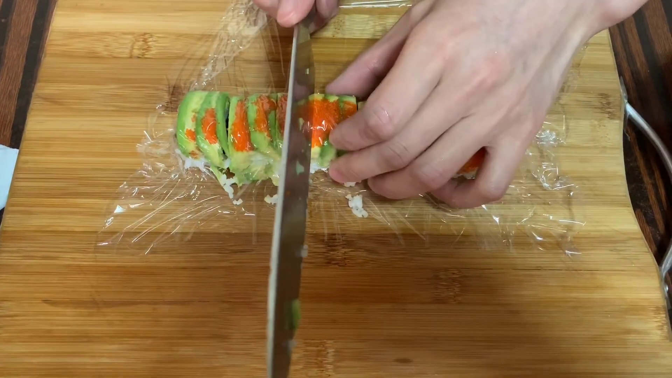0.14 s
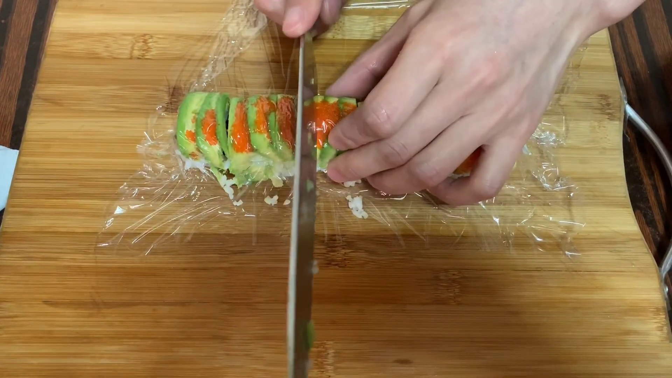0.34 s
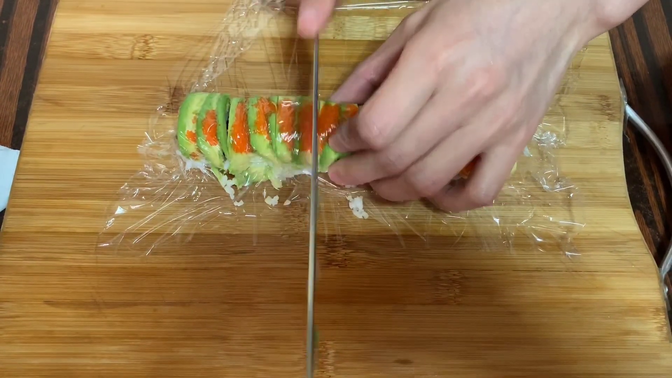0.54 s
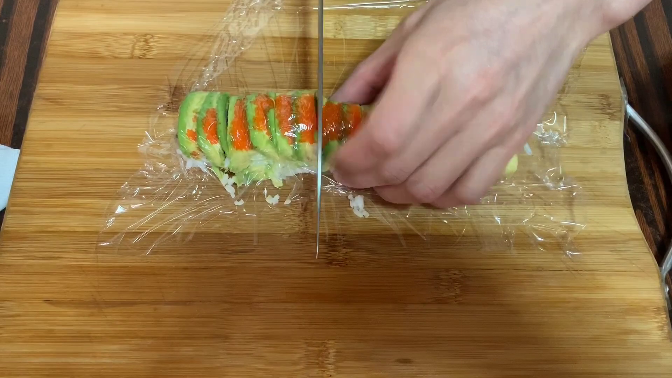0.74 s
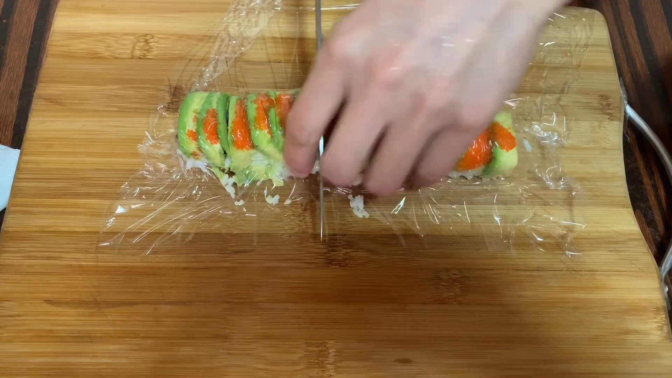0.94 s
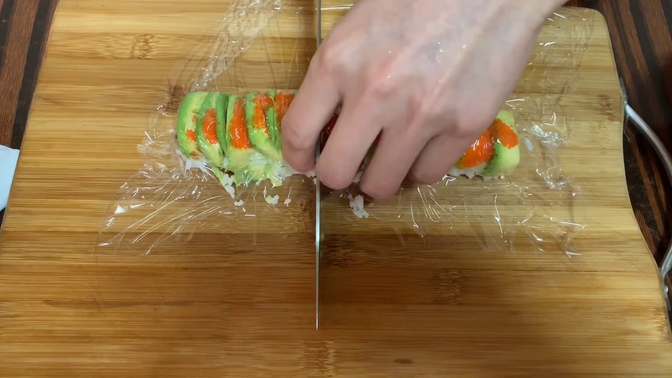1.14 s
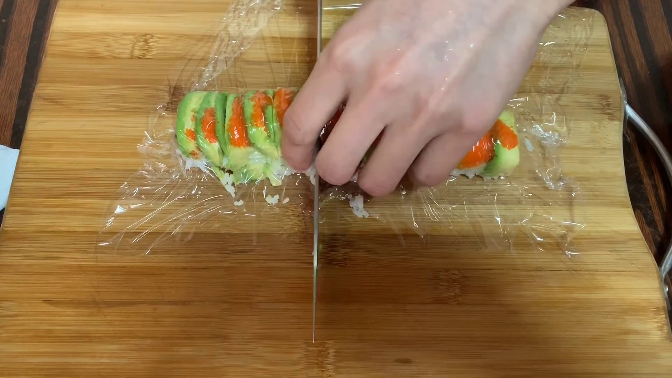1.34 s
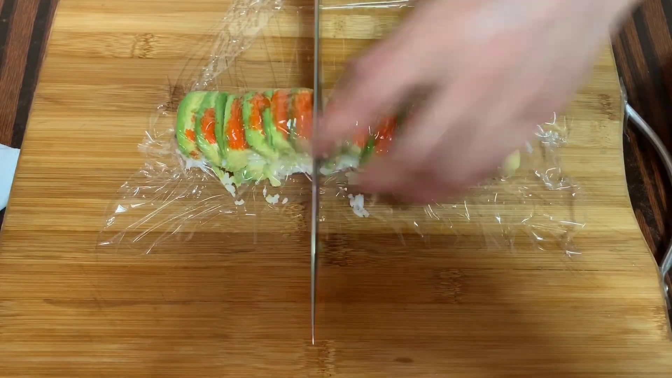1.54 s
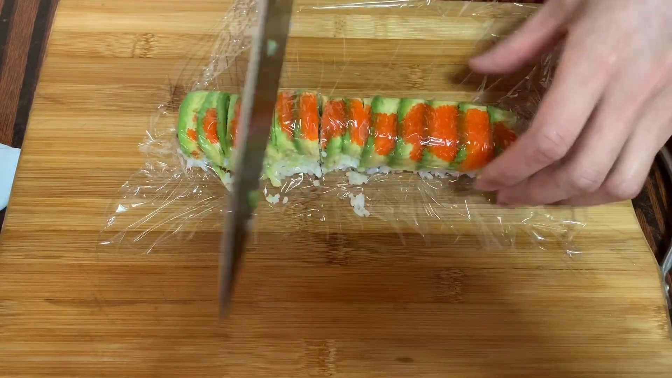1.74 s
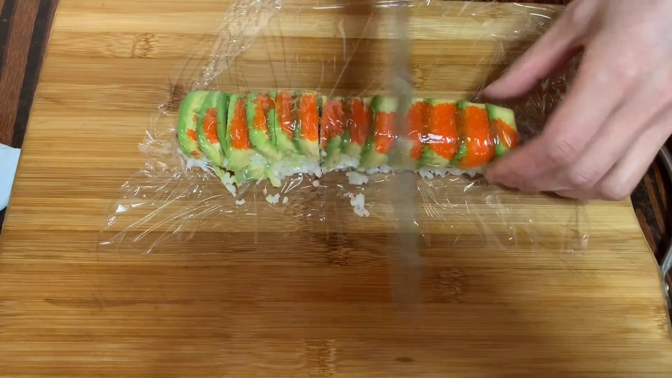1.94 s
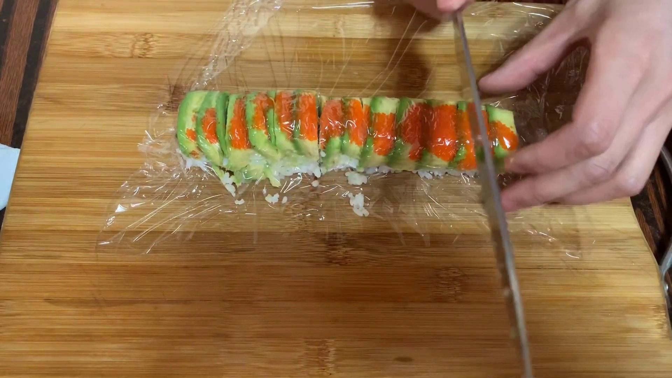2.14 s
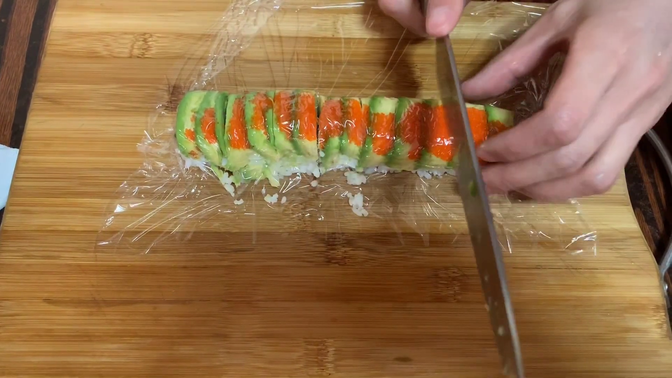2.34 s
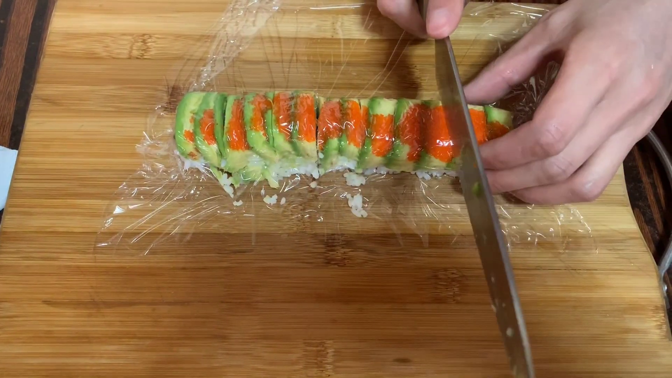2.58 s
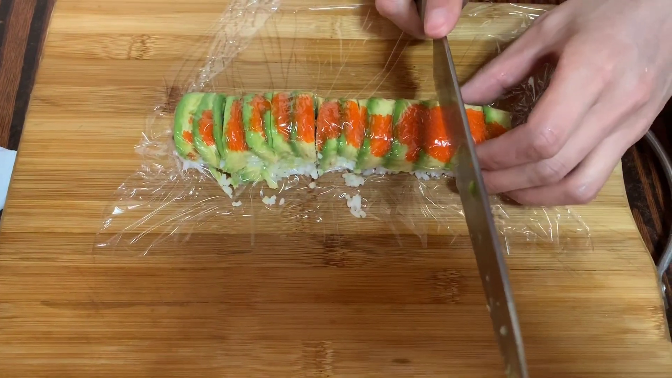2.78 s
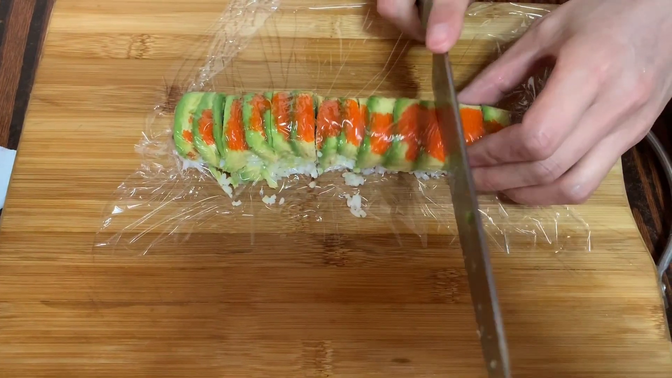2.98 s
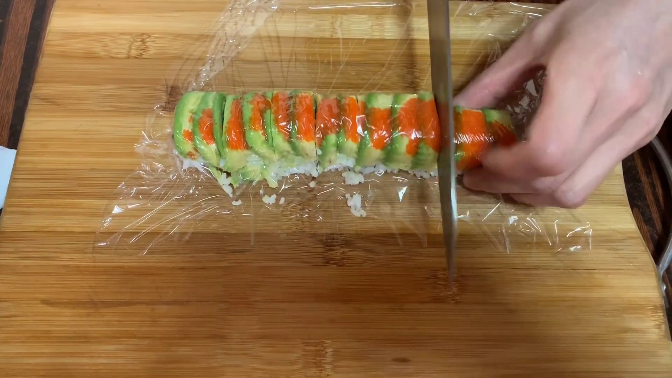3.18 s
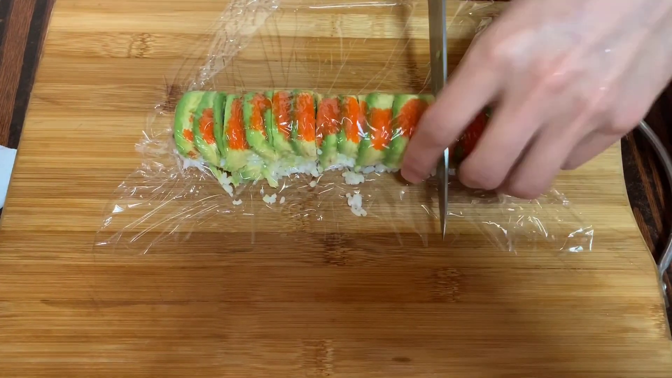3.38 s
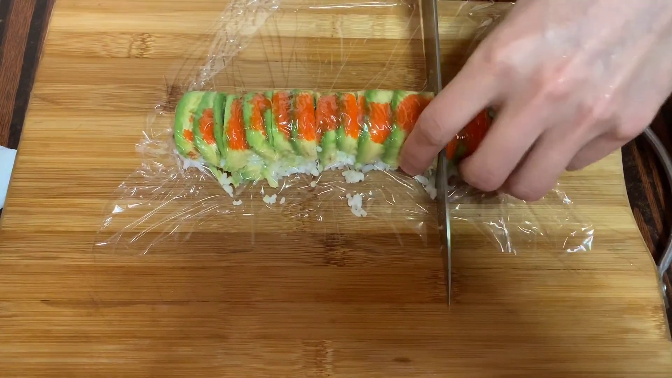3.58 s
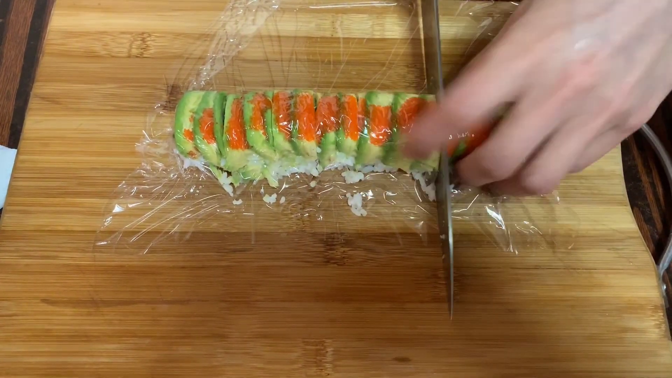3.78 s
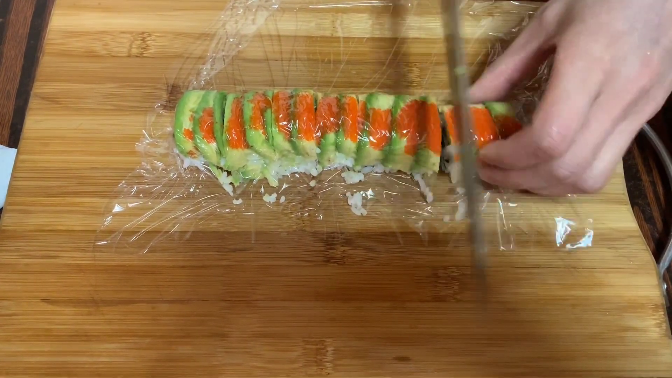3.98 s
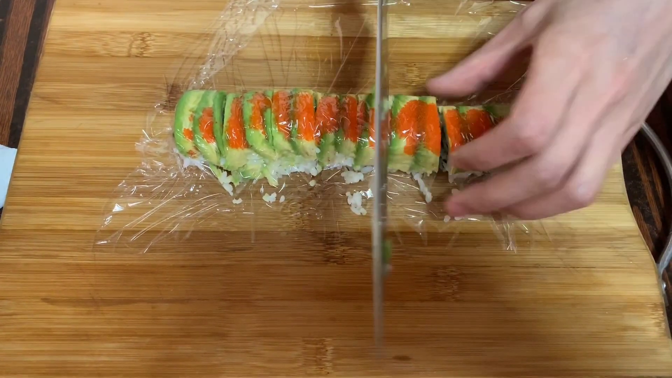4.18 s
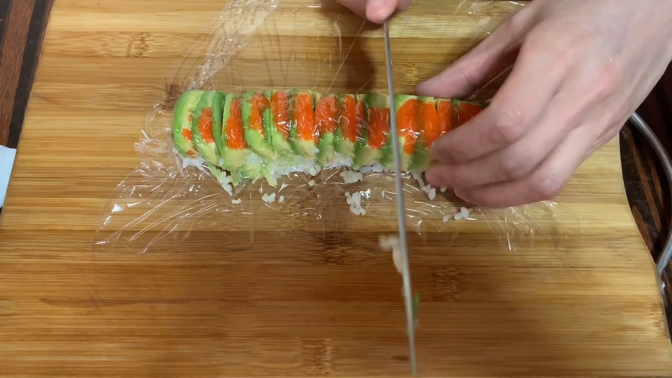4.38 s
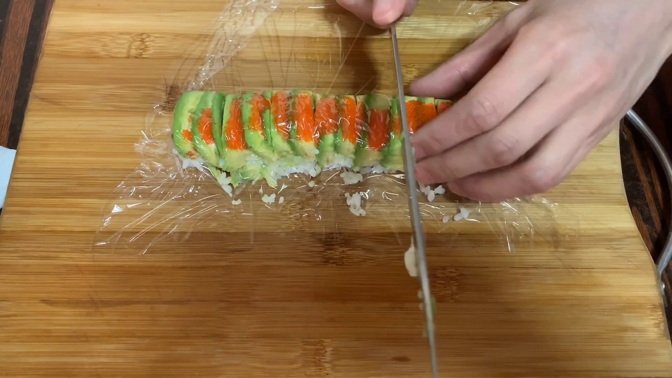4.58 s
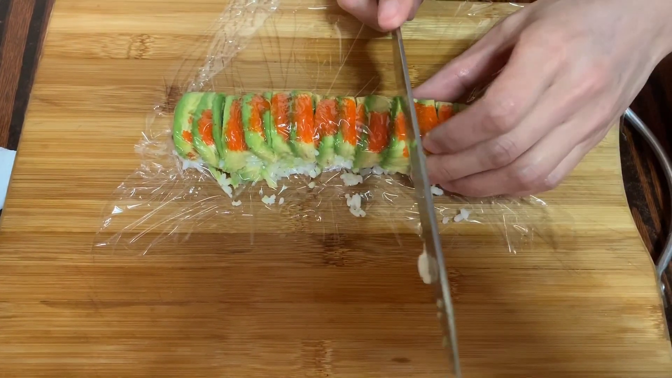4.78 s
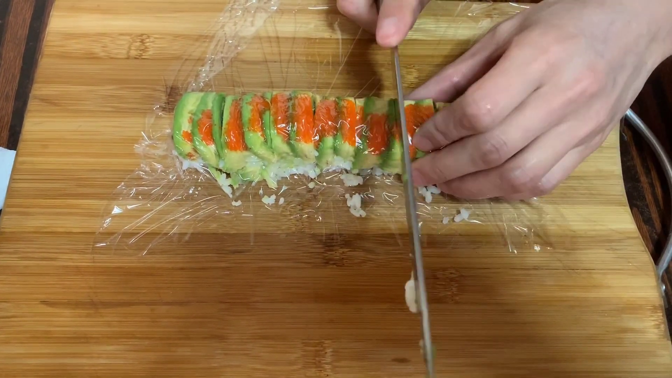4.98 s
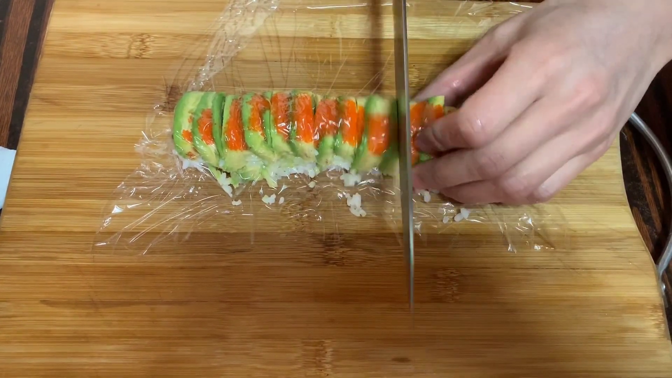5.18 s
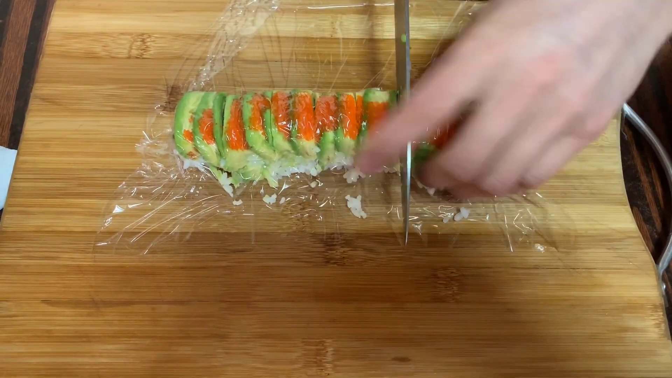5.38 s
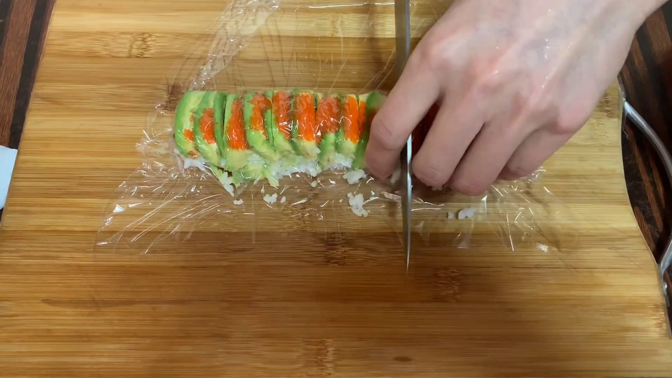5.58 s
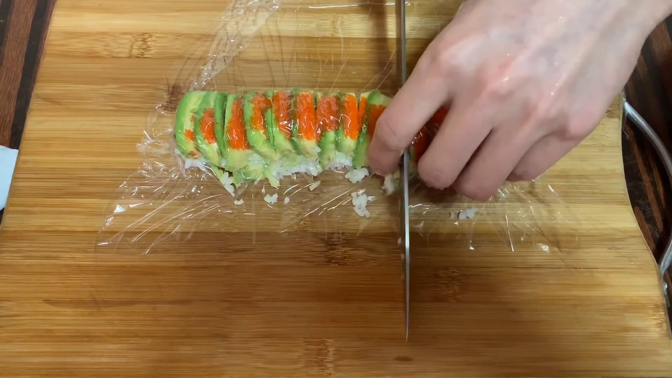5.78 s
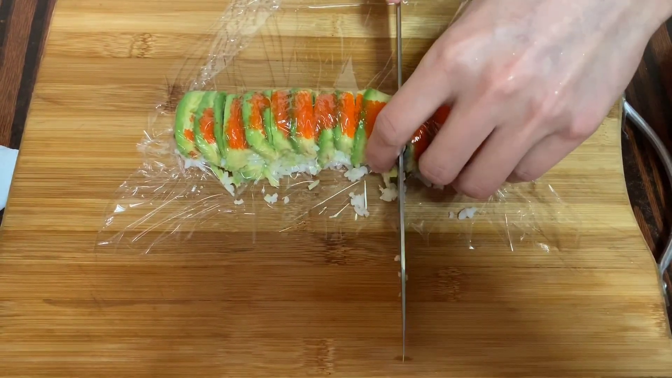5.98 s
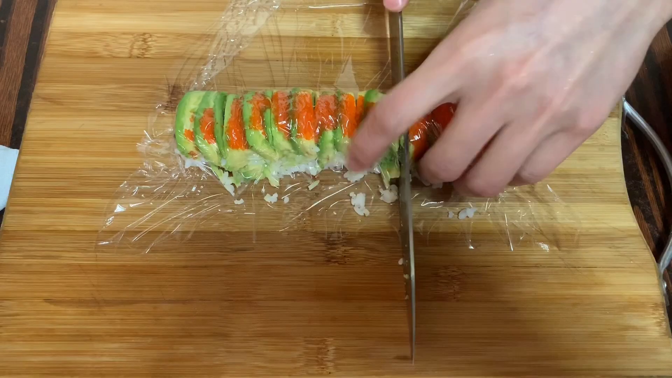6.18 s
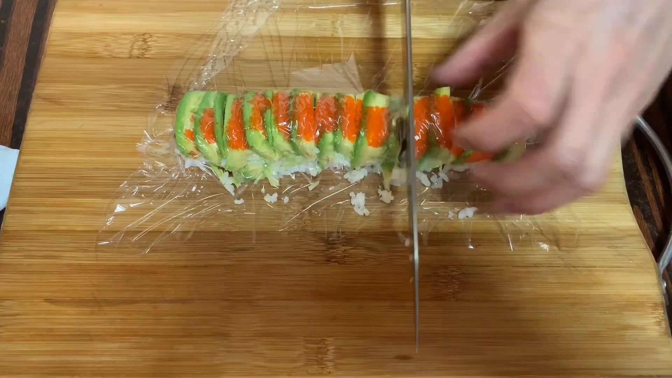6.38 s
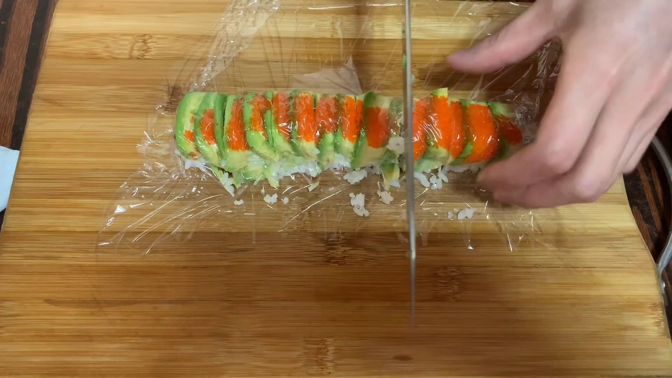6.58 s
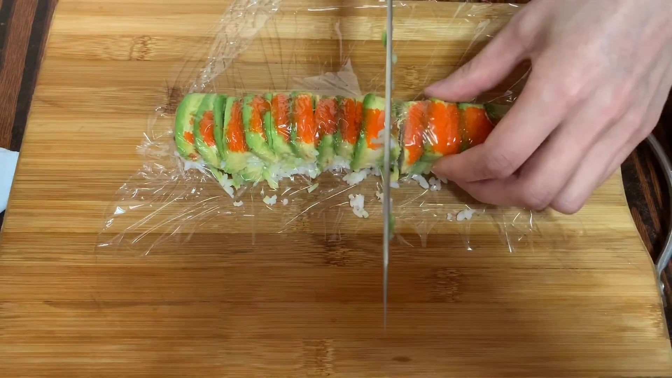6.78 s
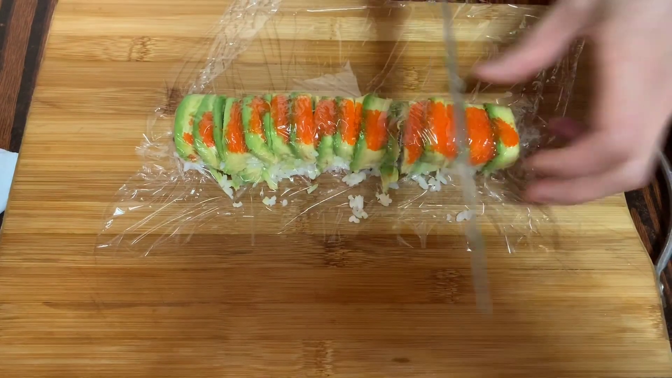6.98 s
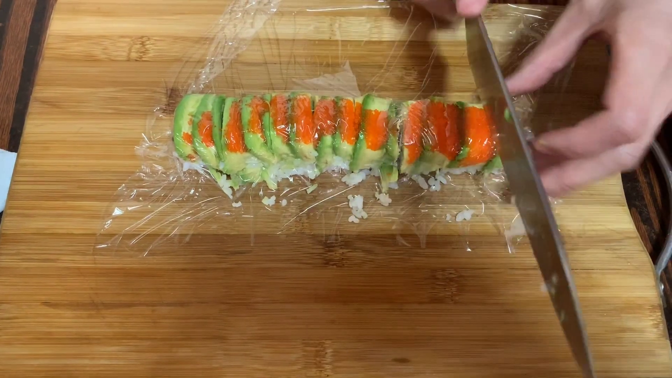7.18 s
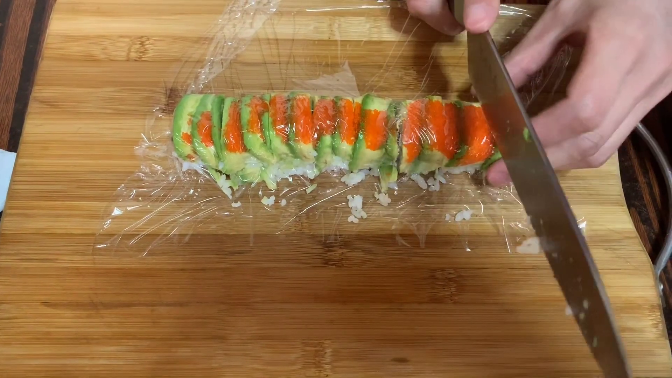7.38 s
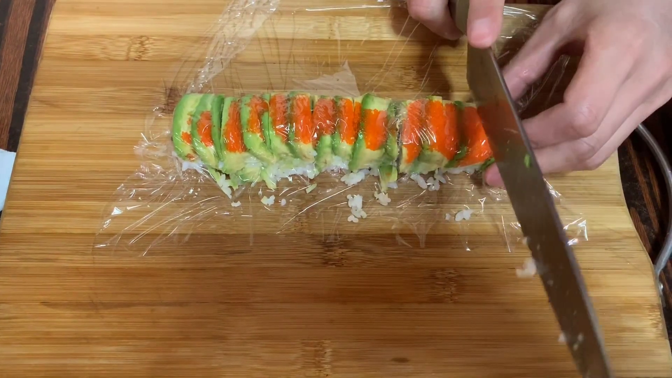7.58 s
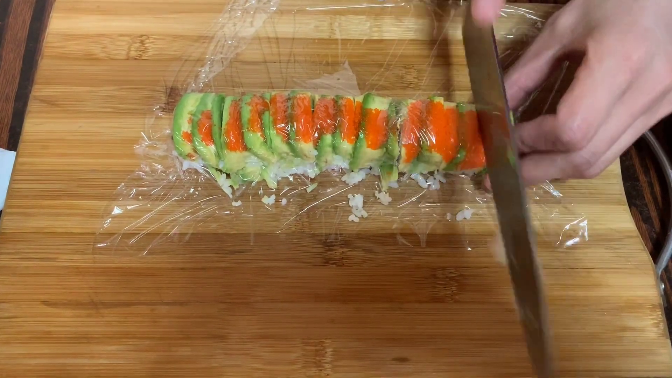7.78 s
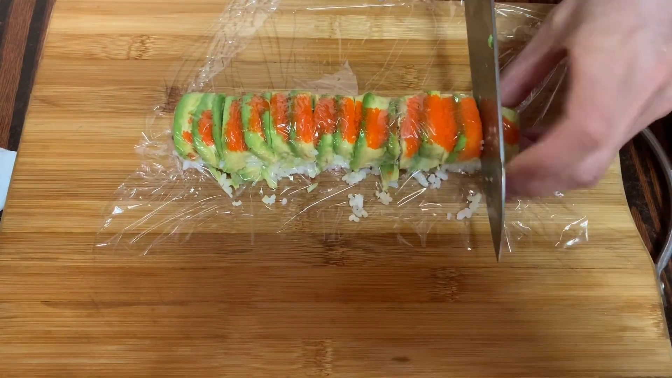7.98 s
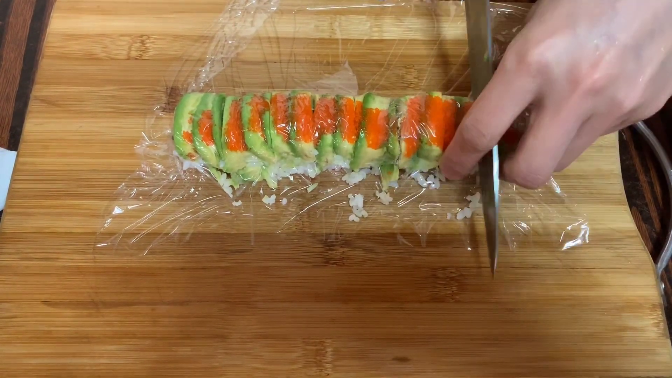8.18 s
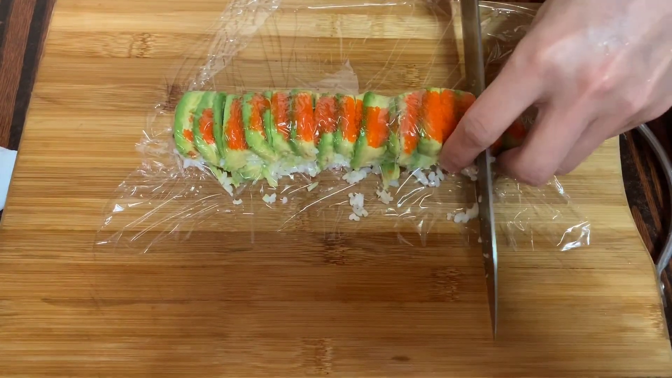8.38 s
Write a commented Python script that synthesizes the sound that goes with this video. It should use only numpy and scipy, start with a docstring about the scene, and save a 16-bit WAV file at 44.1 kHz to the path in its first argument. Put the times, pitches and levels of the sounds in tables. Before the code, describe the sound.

Close up in a small quiet kitchen, a knife cuts through a sushi-like roll wrapped in cling film. Thin plastic crackles and snaps while moist rice and avocado squelch underneath. A firm woody knock lands just after one second, another near six, and a much softer one at the very end, with small hand bumps after them. Faint room tone and low hum sit behind.

```python
"""In a small kitchen, a knife slices a rice roll wrapped in cling film on a wooden cutting board.
The film crinkles and the wet filling squelches: dense clicks in resonators, louder under strain.
Creases snap as short noise bursts; knocks and softer bumps set the modes of board and blade ringing.
Brief squeaks glide; behind them lie diffuse reverberation, room tone, an appliance hum and a rumble."""
import sys
import numpy as np
from scipy import signal
from scipy.fft import rfft, irfft, next_fast_len
from scipy.io import wavfile

SR = 44100
rng = np.random.default_rng(int(sys.argv[2]) if len(sys.argv) > 2 else 0)


def file_out(sig):
    """Save sig as 16-bit WAV at sys.argv[1]."""
    # one column per channel
    cols = np.atleast_2d(sig).T
    # limit, then scale
    lim = np.clip(cols, -1, 1)
    pcm = np.round(lim * 32767).astype(np.int16)
    wavfile.write(sys.argv[1], SR, pcm)


N = 371763
TIME = np.arange(N) / SR

# blade lands on the board, levels relative: start_s, board_db, edge_clack_db, blade_ring_db,
# settle_s (until the rest of the edge lands), place (0 to 1 between two spots)
LANDINGS = [(1.2395, -0.5, -16.5, -31, 0.0041, 0), (5.8045, 0, -17.5, -59.5, 0.0042, 0.72),
            (8.4063, -10.5, -32.5, -52, 0.0058, 0.07)]
# spectrum of the crackling film: frequency_hz, density_db (relative, per Hz)
FILM_SPECTRUM = [(500, -27), (1200, -6.5), (2500, -9), (4500, -9), (6300, -9.5), (8300, 0.5), (10500, 1),
                 (12000, -2.5), (14500, 1.5), (16000, -1.5)]
# spectrum of the wet filling: frequency_hz, density_db (relative, per Hz)
FILLING_SPECTRUM = [(300, -6.5), (800, -5.5), (1300, -0.5), (1900, -0.5), (2800, -3.5), (4200, -7),
                    (6000, -7.5), (12000, -32)]


def from_db(db):
    """Level to amplitude: 20 dB is a factor of ten."""
    return 10 ** (np.asarray(db) / 20)


def rms_one(x):
    """Normalisation to unit root-mean-square amplitude."""
    return x / np.sqrt(np.mean(x ** 2) + 1e-20)


def at_hz(points, hz):
    """Interpolation of a spectrum along logarithmic frequency."""
    points = np.array(points)
    return np.interp(np.log(hz + 1), np.log(points[:, 0] + 1), points[:, 1])


def add(track, s, sound):
    """Superposition: a short sound is summed into the track at time s."""
    start = round(s * SR)
    track[..., start:start + sound.shape[-1]] += sound[..., :N - start]


def colour(x, spectrum):
    """Minimum-phase filtering: folding the cepstrum makes the given spectrum causal."""
    size = 2048
    log_gain = np.log(from_db(at_hz(spectrum, np.fft.rfftfreq(size, 1 / SR))))
    cepstrum = irfft(log_gain)
    folded = np.r_[cepstrum[0], 2 * cepstrum[1:size // 2]]
    impulse_response = irfft(np.exp(rfft(folded, size)))
    return signal.oaconvolve(x, impulse_response)[:N]


def ring(force, hz, t60):
    """Damped resonance: a unit click starts a sine of initial height 1 that falls 60 dB in t60 seconds."""
    radius = np.exp(-np.log(1000) / (t60 * SR))
    angle = 2 * np.pi * hz / SR
    feedback = [1, -2 * radius * np.cos(angle), radius * radius]
    return signal.lfilter([0, np.sin(angle)], feedback, force + 1e-18)


def drift(rate):
    """Slow random modulation: straight lines join Gaussian knots, rate per second, at unit rms."""
    knots = rng.standard_normal(4096)
    return rms_one(np.interp(TIME * rate, np.arange(len(knots)), knots))


def diffuse(spectrum, size):
    """Diffuse field: two noise channels alike in the bass and nearly unrelated in the treble."""
    # likeness of the two channels: frequency_hz, correlation (0 to 1)
    likeness = [(100, .998), (280, .96), (600, .65), (1300, .3), (2600, 0), (15000, .1)]
    hz = np.fft.rfftfreq(size, 1 / SR)
    mid, side = rfft(rng.standard_normal((2, size)))
    alike = at_hz(likeness, hz)
    common = np.sqrt((1 + alike) / 2) * mid
    opposed = np.sqrt((1 - alike) / 2) * side * [[1], [-1]]
    return irfft((common + opposed) * from_db(at_hz(spectrum, hz)), size)


def background(tone_db=-56, rumble_db=-2, waver_db=1.5):
    """Stationary noise and modulated tones: room tone, a wavering appliance hum and a low rumble."""
    # room tone spectrum: frequency_hz, density_db (relative)
    tone_spectrum = [(12, -37), (20, -19.5), (68, -1), (91, -12.5), (123, -8.5), (182, -10), (241, -7),
                     (328, -18), (513, -18.5), (873, -24.5), (1480, -26), (2080, -46), (2320, -35.5),
                     (6910, -49.5), (16000, -56.5)]
    # appliance hum, each partial wavering about its level: frequency_hz, rms_level_db
    hum_partials = [(63.5, -60.5), (120, -61), (193, -68.5), (241, -70.5), (302, -72.5)]
    # rumble swelling once, before the trim rumble_db: time_s, level_db
    rumble_levels = [(0.0, -57), (5.6, -61.5), (6.9, -46.5), (7.44, -55), (7.7, -70)]
    rumble_spectrum = [(10, -31.0), (28, -3), (45, -12), (90, -33), (400, -96.0)]  # Hz, dB

    size = next_fast_len(N)
    tone = from_db(tone_db) * rms_one(diffuse(tone_spectrum, size)[:, :N])
    hum = np.zeros(N)
    for hz, db in hum_partials:
        amplitude = np.sqrt(2) * from_db(db + waver_db * drift(5.4))
        hum += amplitude * np.sin(2 * np.pi * hz * TIME + .6 * drift(5.2))
    rumble = rms_one(diffuse(rumble_spectrum, size)[:, :N])
    swell_db = np.interp(TIME, *np.transpose(rumble_levels))
    return tone + hum + from_db(swell_db + rumble_db) * rumble


def kitchen(x, first_echo_s=0.0017, build_s=0.002):
    """Reverberation: convolution with diffuse noise that decays exponentially, octave by octave."""
    # kitchen decay: frequency_hz, t60_s, level_db (relative)
    decay = np.array([(78.5, 0.32, -0.5), (250.4, 0.29, -1.5), (600, 0.29, 8.5), (1500, 0.44, -4),
                      (4300, 0.35, 7.5), (14200, .25, -11)])
    t = TIME[:SR // 2]
    hz = np.fft.rfftfreq(len(t), 1 / SR)
    noise = rfft(diffuse(decay[:, ::2], len(t)))
    octave = np.round(np.log2(np.maximum(hz, 64)))
    tail = np.zeros((2, len(t)))
    for k in np.unique(octave):
        band = irfft(noise * (octave == k), len(t))
        tail += band * np.exp(-np.log(1000) * t / at_hz(decay, 2 ** k))
    onset = np.clip((t - first_echo_s) / build_s, 0, 1)
    tail = tail * onset / np.sqrt(SR * 0.037)
    return signal.oaconvolve(x, tail, axes=-1)[:, :N]


def squeaks():
    """Frictional squeaks as things slide on the film: gliding sines with rough random amplitude."""
    # faint squeaks: start_s, length_s, start_hz, end_hz, level_db
    glides = [(2.59, .14, 3800, 3300, -71), (3.84, .07, 1400, 1750, -63), (6.35, .08, 1650, 1350, -63),
              (7.18, .16, 3080, 2580, -67)]
    out = np.zeros(N)
    for s, length, start_hz, end_hz, db in glides:
        size = round(length * SR)
        phase = 2 * np.pi * np.cumsum(np.linspace(start_hz, end_hz, size)) / SR
        roughness = drift(373)[:size]
        add(out, s, from_db(db) * np.hanning(size) ** .5 * roughness * np.sin(phase))
    return out


def blade(skid_s=0.0057):
    """Modal ringing of steel: its edge skids just after landing, one click into thin, high modes."""
    # steel modes: frequency_hz, level_db (relative), t60_s
    steel_modes = [(7320, -1, 0.09), (8220, -3.5, .1), (10700, -9, 0.068), (10060, 4.5, 0.076),
                   (11100, -2, 0.068)]
    force = np.zeros(N)
    for s, _, _, blade_db, _, _ in LANDINGS:
        add(force, s + skid_s, from_db([blade_db]))
    return sum(from_db(db) * ring(force, hz, t60) for hz, db, t60 in steel_modes)


def board(settle_db=-2, clack_hz=1620, clack_t60=0.0054, contact_hz=7000, push_place=0.34,
          thud_db=-29, thud_hz=135):
    """Modal excitation: hard knocks and soft, grainy pushes drive the same modes of the wood."""
    # knife and hand press on the board: start_s, level_db (relative), softness_hz, decay_s
    bumps = [(1.23, -16, 1500, 0.0042), (1.381, -11.5, 167, 0.057), (1.479, -16, 600, 0.0065),
             (1.485, -11, 220, 0.033), (1.513, -15, 139, .02), (3.654, -22, 1500, 0.018),
             (3.663, -16, 440, 0.029), (3.868, -23, 193, 0.03), (4.019, -25.5, 195, .01),
             (4.045, -24.5, 216, .025), (5.802, -16, 1500, 0.0043), (5.999, -15, 520, 0.0026),
             (6.043, -10, 167, 0.049), (6.056, -25.5, 1300, 0.0054), (6.242, -23, 916, 0.013),
             (6.264, -21, 895, 0.011), (6.261, -5, 146, 0.036), (8.375, -33, 910, .025),
             (8.394, -6.5, 105, 0.014)]
    # wood modes: frequency_hz, first_spot_db, second_spot_db (where struck), t60_s
    wood_modes = [(75.3, -34.5, -31.5, 0.62), (104, -27.5, -25, 0.13), (195.7, -19, -22.5, 0.11),
                  (260, -15, -20.5, 0.045), (313.4, -15, -23, 0.072), (387, -30.5, -38, 0.12),
                  (490, -14.5, -16.5, 0.017), (537.6, -19.5, -14, 0.048), (600, -20, -30.5, 0.042),
                  (633, -20, -37.5, 0.064), (675, -25, -35.5, 0.052), (793, -27.5, -25, 0.089),
                  (896, -27, -25.5, 0.086), (1048, -29.5, -31.5, 0.087), (1228, -21, -21, 0.057),
                  (1360, -8.5, -22, 0.0073), (1541, -20, -17, 0.058), (1866, -22.5, -12.5, 0.042),
                  (1796, -12, -28, 0.016), (1930, -35, -18.5, 0.012), (2292, -34, -15, 0.0043),
                  (3840, -47, -27.5, 0.024), (4340, -27.5, -34.5, 0.0076)]
    # board heard from the left: frequency_hz, left_minus_right_db
    board_pan = [(400, 0), (700, 1.5), (1400, 7), (2200, 6), (4000, -1)]

    force, edge, pushes = np.zeros((2, N)), np.zeros(N), np.zeros(N)
    for s, board_db, edge_db, _, settle_s, place in LANDINGS:
        add(force, s, from_db(board_db) * np.array([[1 - place], [place]]))
        add(edge, s, from_db([edge_db]))
        add(edge, s + settle_s, from_db([edge_db + settle_db]))

    t = TIME[:SR // 5]
    for s, db, soft_hz, decay_s in bumps:
        rub = rng.standard_normal(len(t)) * np.exp(-t / decay_s)
        push = 1.25 * rub / np.linalg.norm(rub) + 0.56 * (t == 0)
        softened = signal.lfilter(*signal.butter(2, soft_hz, fs=SR), push)
        add(pushes, s, from_db(db) * softened)
    force = force + np.outer([1 - push_place, push_place], pushes)

    # neighbouring modes swing in opposite directions, so the body swells a few ms after the clack
    parts = []
    for k, (hz, *spot_db, t60) in enumerate(wood_modes):
        parts.append((hz, (-1) ** k * ring(from_db(spot_db) @ force, hz, t60)))
    parts.append((clack_hz, ring(edge, clack_hz, clack_t60)))
    # slow pushes also rock the whole board on the counter
    parts.append((thud_hz, from_db(thud_db) * ring(pushes, thud_hz, 0.17)))

    heard = np.zeros((2, N))
    for hz, x in parts:
        heard += x * from_db(at_hz(board_pan, hz) * np.array([[.5], [-.5]]))
    return signal.lfilter(*signal.butter(2, contact_hz, fs=SR), heard)


def strain():
    """Build-up and relaxation: powers of presses, gives and resting fingers add to two gain curves."""
    # blade or fingers bear steadily on the roll: start_s, length_s, film_db, filling_db (relative)
    presses = [(0.614, .08, -70.5, -69.5), (0.707, .25, -61, -62), (0.984, 0.32, -68, -65.5),
               (1.604, .15, -67, -63), (2.378, .05, -71.5, -73), (2.437, .19, -68, -70.5),
               (3.135, .31, -57, -65.5), (3.516, .14, -57, -57.5), (3.81, .1, -58.5, -62.5),
               (4.026, .12, -53.5, -57), (4.2, .32, -62.5, -62.5), (5.156, .29, -62, -64.5),
               (5.535, .24, -60, -72), (5.973, .125, -54, -58), (6.258, .16, -74, -63),
               (6.434, .13, -59.5, -61), (7.039, .18, -69, -70), (7.308, .24, -65, -63),
               (7.9, .21, -57, -80), (8.281, .13, -58, -59.5)]
    # film is pulled taut and gives way: peak_s, film_db, filling_db (relative), build_up_s (time constant)
    gives = [(0.757, -50, -51, .012), (1.252, -32.5, -37, .017), (1.447, -45, -41, 0.01),
             (1.49, -57, -42.5, .016), (1.725, -58, -54, .017), (1.978, -48, -56.5, .028),
             (2.044, -57.5, -87, .012), (2.156, -43, -59, .01), (2.184, -46.5, -52, 0.008),
             (2.488, -53.5, -55, 0.011), (3.228, -51, -45.5, .008), (3.27, -55, -46, .017),
             (3.664, -36, -45, .021), (3.69, -46.5, -44, 0.026), (5.199, -54.5, -70, .025),
             (5.334, -48.5, -53.5, 0.016), (5.36, -51.5, -64, .02), (5.815, -38.5, -38.5, 0.028),
             (6.03, -42.5, -53, .02), (6.063, -52, -39.5, 0.0045), (6.27, -66, -48.5, .013),
             (6.485, -51, -53, .025), (7.087, -66, -53, 0.008), (7.869, -52.5, -51, .012),
             (8.008, -45.5, -57.5, .035), (8.074, -52.5, -52, .017), (8.394, -43, -41.5, .02)]
    attack_s, release_s = 0.0087, .025  # time constants of a press
    relax_s = (.02, 0.017)  # time constants of film and filling after giving way
    resting_db = (-84, -78)  # film and filling under a resting hand
    fidget_db, fidget_per_s = 2.5, 18  # resting fingers shift a little
    ragged_db, ragged_per_s = 1.88, 28  # a steady press crinkles unevenly

    step = 40  # samples between points of the curves
    t = TIME[::step]
    power = np.zeros((2, len(t)))
    for k, db in enumerate(resting_db):
        power[k] = from_db(db + fidget_db * drift(fidget_per_s)[::step]) ** 2
    ragged = from_db(ragged_db * drift(ragged_per_s)[::step])
    for s, length, *db in presses:
        exponent = np.minimum((t - s) / attack_s, (s + length - t) / release_s)
        shape = np.exp(exponent.clip(-20, 0))
        power += np.outer(from_db(db), ragged * shape) ** 2
    for s, film_db, filling_db, build_s in gives:
        for k, db in enumerate((film_db, filling_db)):
            exponent = np.minimum((t - s) / build_s, (s - t) / relax_s[k])
            power[k] += (from_db(db) * np.exp(exponent.clip(-20, 0))) ** 2
    return [np.interp(TIME, t, gain) for gain in np.sqrt(power)]


def grains(per_s, spread_db, low_hz, high_hz, cycles, clump_db, patchy_db, count=14):
    """Granular crackle: clumped random clicks of many sizes excite resonators that come and go."""
    size_db = spread_db * np.minimum(rng.exponential(1, N), 4.5) + clump_db * drift(55)
    sizes = from_db(size_db) * rng.choice([-1, 1], N)
    born = rng.random(N) < per_s / SR
    dealt = rng.integers(0, count, N)  # which resonator each click excites
    out = np.zeros(N)
    for k, hz in enumerate(np.linspace(low_hz, high_hz, count)):
        mine = born & (dealt == k)
        clicks = np.zeros(N)
        clicks[mine] = sizes[mine] * from_db(patchy_db * drift(24)[mine])
        out += rms_one(ring(clicks, hz, cycles / hz))
    return rms_one(out)


def slicing(crinkle, squelch, film_db=1.0, filling_db=-2):
    """Strain-driven crackle: dry film over the lower, wet crackle of rice and avocado."""
    film = grains(per_s=7000, spread_db=3.2, low_hz=2000, high_hz=15500, cycles=6,
                  clump_db=1.6, patchy_db=2.5)
    filling = grains(per_s=2200, spread_db=3, low_hz=900, high_hz=6000, cycles=11,
                     clump_db=1.3, patchy_db=2)
    dry_crackle = crinkle * rms_one(colour(film, FILM_SPECTRUM))
    wet_crackle = squelch * rms_one(colour(filling, FILLING_SPECTRUM))
    return from_db(film_db) * dry_crackle + from_db(filling_db) * wet_crackle


def ticks(crinkle, count=130):
    """Random release of small creases, likelier and louder under strain: start_s, film_db, wet_db."""
    quietest_db, loudest_db = -76, -55  # crinkle levels between which ticks grow with the strain
    crowding = .55  # power by which their rate follows the crinkle
    tick_db, spread_db = 5.5, 1  # typical level against the crinkle, and spread
    wet_db = -12.5  # wet pop against the film snap
    chance = np.cumsum(np.minimum(crinkle, from_db(loudest_db)) ** crowding)
    at = np.searchsorted(chance, rng.random(count) * chance[-1])
    size = np.clip(rng.standard_normal(count), -2, 1.6)
    strain_db = np.clip(20 * np.log10(crinkle[at]), quietest_db, loudest_db)
    db = strain_db + tick_db + spread_db * size
    return list(zip(at / SR, db, db + wet_db))


def snaps(rows, snap_db=2.0, pop_db=2.5):
    """Sudden release: a crease gives way in a few ms of tinted noise; the filling pops beneath it."""
    rise_s, decay_s, quickness = 0.0012, 0.0033, 1.4
    tint_db = 3  # random spread of each snap's colour
    t = TIME[:SR // 40]
    shape = (1 - np.exp(-t / rise_s)) * np.exp(-(t / decay_s) ** quickness)
    shape = shape / shape.max()
    out = np.zeros(N)
    for s, film_db, wet_db in rows:
        for spectrum, db in ((FILM_SPECTRUM, film_db + snap_db), (FILLING_SPECTRUM, wet_db + pop_db)):
            tint = rng.normal(0, tint_db, len(spectrum))
            tinted = np.array(spectrum) + np.outer(tint, [0, 1])
            sound = colour(rng.standard_normal(len(t)) * shape, tinted)
            # equal energy whatever the tint
            add(out, s, from_db(db) * sound * np.linalg.norm(shape) / np.linalg.norm(sound))
    return out


def scatter(x, spread_s=.0015, from_hz=900, wander_rad=1.6):
    """Decorrelation by reflections: a wandering side signal with random delays, weak in the bass."""
    size = 1024
    hz = np.fft.rfftfreq(size, 1 / SR)
    delays = spread_s * rng.random(len(hz))
    bass_cut = hz / np.hypot(hz, from_hz)
    paths = np.exp(-2j * np.pi * hz[1] * np.cumsum(delays)) * bass_cut
    angle = wander_rad * drift(60)
    side = signal.oaconvolve(x, irfft(paths))[:N] * np.cos(angle)
    side += signal.oaconvolve(x, irfft(1j * paths))[:N] * np.sin(angle)
    return np.array([x + side, x - side]) / np.sqrt(2)


def scene(wood_wet_db=-8, film_wet_db=-8):
    """Direct and reverberant sound: board and roll close by, the kitchen behind them."""
    # loudest snaps: start_s, film_snap_db, wet_pop_db (relative)
    loud_snaps = [(0.751, -37, -48.5), (0.9446, -52, -59), (1.0156, -53, -66), (1.074, -56, -59),
                  (1.1396, -45.5, -61), (1.2095, -40, -51), (1.2474, -40, -48), (1.2564, -29, -38),
                  (1.4388, -38, -48), (1.724, -50, -61), (2.1425, -45.5, -66.5), (2.1855, -35.5, -52.5),
                  (2.5255, -44.5, -59), (2.889, -58, -58.5), (3.0145, -56.5, -82), (3.1215, -66, -67),
                  (3.22, -43, -57), (3.4037, -45, -56), (3.6316, -40, -45), (3.6571, -43, -55),
                  (3.895, -40, -57), (3.9562, -48, -58), (4.028, -64, -57), (4.0934, -41.5, -64),
                  (4.9551, -65, -88), (5.0419, -59, -79.5), (5.1282, -53.5, -72), (5.3175, -45, -47.5),
                  (5.378, -39, -54), (5.473, -54, -53.5), (5.539, -54, -53.5), (5.6446, -48.5, -67.5),
                  (5.977, -40.5, -47), (6.441, -47, -63), (7.1711, -63, -71), (7.317, -56, -73),
                  (7.3823, -47, -69), (7.5125, -47, -54), (7.8685, -54, -46.5), (7.9765, -51, -53)]
    crinkle, squelch = strain()
    wood = board()
    crackle = slicing(crinkle, squelch) + snaps(loud_snaps + ticks(crinkle))
    roll = scatter(crackle + blade() + squeaks())
    reverberation = kitchen(from_db(wood_wet_db) * wood + from_db(film_wet_db) * roll)
    return wood + roll + reverberation + background()


def record(dry):
    """Mid-side filtering: the microphone pair narrows some treble bands, widens others; the top is cut."""
    # favours what is alike (+) or opposed (-) in the channels: frequency_hz, bias (-1 to 1)
    pair_bias = [(1500, 0), (3400, -.3), (5400, -.35), (6200, 0), (7000, .8), (8000, .93), (8700, .45),
                 (9400, -.96), (9900, -.1), (11500, -.2), (12400, 0), (13100, .7), (14000, .93),
                 (14800, .7), (15800, -.6)]
    cutoff_hz = 15900
    hz, bias = np.transpose(pair_bias)
    mid = colour((dry[0] + dry[1]) / 2, np.c_[hz, 10 * np.log10(1 + bias)])
    side = colour((dry[0] - dry[1]) / 2, np.c_[hz, 10 * np.log10(1 - bias)])
    top_cut = signal.ellip(12, .1, 80, cutoff_hz, fs=SR, output="sos")
    return signal.sosfilt(top_cut, np.array([mid + side, mid - side]))


dry = scene()
out = record(dry)
file_out(out)
```